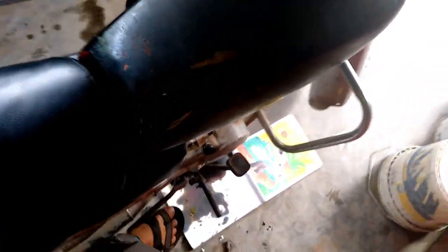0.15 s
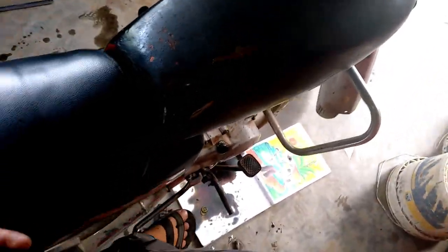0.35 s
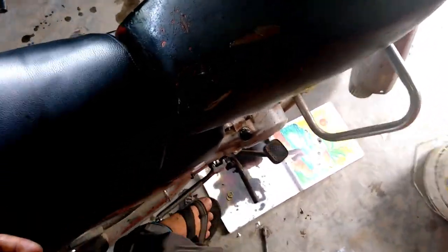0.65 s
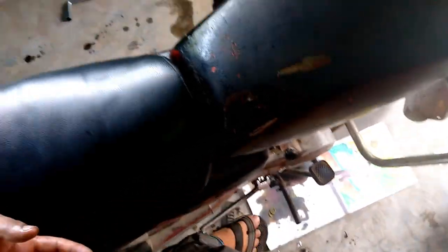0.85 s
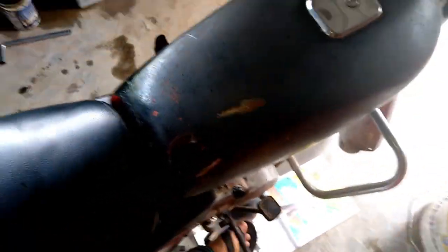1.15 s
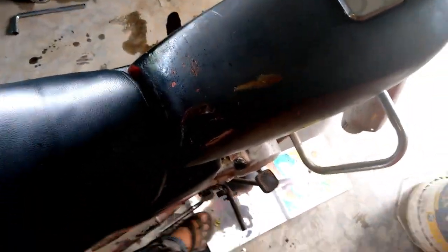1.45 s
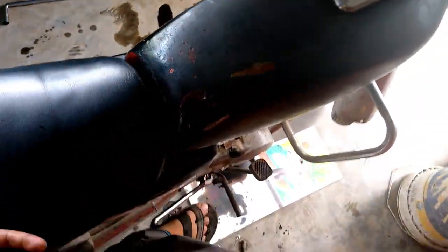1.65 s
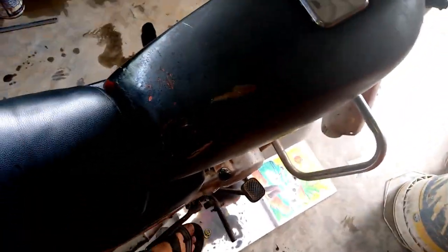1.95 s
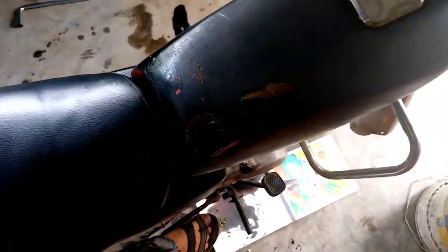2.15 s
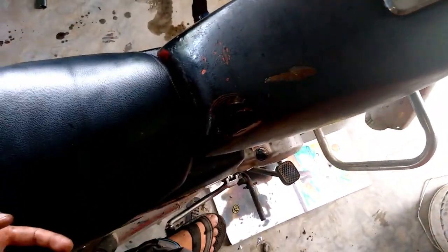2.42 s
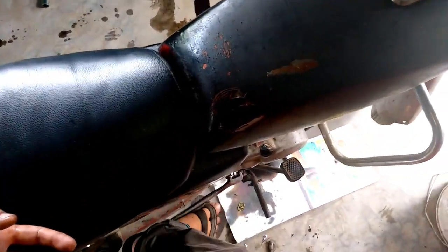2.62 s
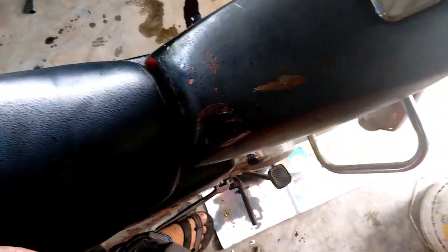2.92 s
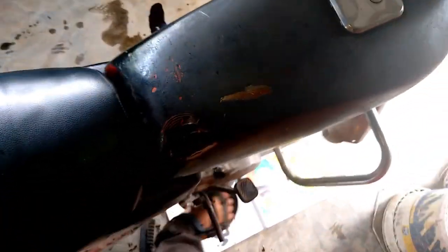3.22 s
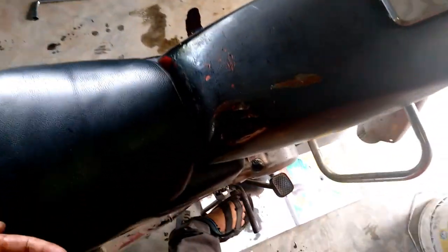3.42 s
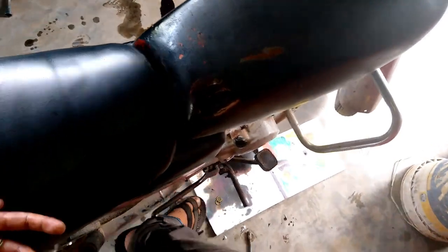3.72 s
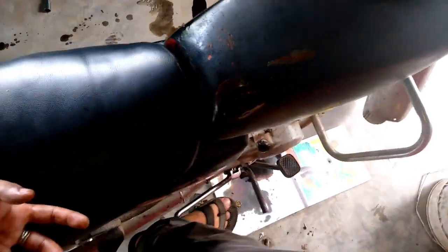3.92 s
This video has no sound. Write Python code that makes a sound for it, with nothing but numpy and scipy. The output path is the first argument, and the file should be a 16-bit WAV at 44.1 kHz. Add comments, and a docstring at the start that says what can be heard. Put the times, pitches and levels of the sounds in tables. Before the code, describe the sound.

Two kicks on a motorcycle's starter lever bring metal clangs, rapid clatter and low exhaust puffs, but the engine never catches.

```python
"""In a small workshop a foot works the kick lever of a single-cylinder motorcycle twice; it does not fire.
Impacts excite resonances: ratchet, valves and sandal clack, and the steel lever clangs on its stop.
The exhaust pipe puffs, the frame rocks on its stand, gears whirr, and friction makes squeaks and scrapes.
A phone hears it all through two unlike microphone ports."""
import sys
import numpy as np
from scipy import signal
from scipy.fft import rfft, irfft, next_fast_len
from scipy.io import wavfile
from scipy.ndimage import uniform_filter1d

SR = 44100
rng = np.random.default_rng(int(sys.argv[2]) if len(sys.argv) > 2 else 0)


def persist_wave(psi):
    """Save psi, clipped to +-1, as 16-bit WAV."""
    counts = np.round(np.clip(psi, -1, 1) * 32767).astype(np.int16)
    wavfile.write(sys.argv[1], SR, np.atleast_2d(counts).T)


N = 179531


def clacks():
    """Impact excitation: dense casing modes merge into noise; tank, struck part and cavity ring out."""
    # Each row: start in seconds, level, heft and brightness in dB, tank and part pitch in Hz,
    # softness as a factor on rise time.
    blows = [(.0044, -40, -13, 3, 705, 780, 1.1), (.2042, -65.5, 19, 2, 297, 985, 1.1),
             (.2275, -55.5, 13, -3, 273, 1280, 3), (.3072, -22, -14, 4, 347, 761, 2.5),
             (.4691, -29.5, .1, -14, 356, 948, 1.1), (.6, -71, 20, 6, 293, 760, 1.1),
             (.7889, -33.5, 2.5, -22, 358, 1107, 1.1), (.83, -24.5, -12, -15, 575, 902, 1.1),
             (.8838, -19.5, -15, -15, 477, 3686, 1.1), (.9176, -31, 7, 2, 340, 1070, 1.1),
             (.9878, -7.5, -17, 12, 388, 2450, .6), (1.0244, -23, -18, .1, 666, 1970, 1.1),
             (1.0565, -20, -14, 5, 322, 2077, 1.1), (1.0943, -21, -20, -5, 205, 2500, 1.1),
             (1.1406, -22, -10, 1.1, 556, 3686, 1.1), (1.1938, -21.5, -14, .1, 377, 856, 2.5),
             (1.254, -22, -13, -3, 580, 936, 2.5), (1.3284, -19.5, -22, -2, 560, 1642, 3.5),
             (1.3852, -17.5, -21, .1, 556, 3470, 1.5), (1.4411, -21.5, -18, -3, 563, 1572, 2.5),
             (1.5093, -20.5, -18, 1.1, 710, 2273, 1.5), (1.555, -40.5, 9, -4, 205, 866, 1.1),
             (1.5888, -37.5, 9, 5, 268, 755, 1.1), (1.643, -28.5, -10, -8, 264, 1305, 1.1),
             (1.6793, -24, -4, -4, 363, 1147, 1.1), (1.8354, -44, -10, -10, 403, 840, 1.1),
             (2.2075, -36.5, 17, -18, 247, 899, 1.1), (2.2288, -30, .1, -14, 227, 911, 2.5),
             (2.2694, -36.5, 7, -3, 238, 953, 1.1), (2.3454, -20.5, -11, 2, 423, 2060, 4),
             (2.5134, -32.5, -1, -4, 366, 1747, 1.5), (2.5424, -22.5, -4, -1, 629, 928, 1.5),
             (2.86, -73, 25, 25, 266, 886, 1.1), (2.8854, -60.5, 19, 20, 277, 894, 1.1),
             (2.9244, -46, -4, 3, 376, 1207, 3), (2.9831, -26.5, -8, -10, 477, 911, 1.5),
             (3.0394, -34, 5, -3, 417, 1032, 1.1), (3.0694, -19.5, -9, -10, 602, 3640, 1.1),
             (3.1077, -31.5, 3, -5, 358, 908, 1.1), (3.1548, -8, -14, 14, 361, 2467, .6),
             (3.1967, -18.5, -13, 3, 307, 2570, 1.1), (3.222, -16.5, -16, -1, 272, 3340, 1.1),
             (3.253, -19.5, -18, 6, 287, 2490, 1.1), (3.2916, -25, -12, -7, 199, 3620, 1.1),
             (3.3361, -24.5, -13, -6, 359, 958, 1.5), (3.3852, -24.5, -9, -1, 276, 978, 2.5),
             (3.4476, -24.5, -8, 3, 405, 866, 1.5), (3.5123, -24, -11, 3, 394, 869, 2.5),
             (3.5945, -19, -17, -1, 560, 2750, 1.5), (3.672, -19.5, -17, 1.1, 400, 857, 3.5),
             (3.749, -20, -26, -1, 701, 2517, 1.5), (3.8242, -37, -1, -8, 644, 860, 1.1),
             (3.9287, -56, 3, -3, 391, 1115, 3)]
    # Each row: low and high edge in Hz, rise and nominal t60 in seconds, level in dB, then dB added
    # per dB of heft, per dB of brightness and per octave of the part above 1 kHz.
    bands = [(1724, 3650, .002, .2, -4.5, 0, 0, 0), (200, 680, .008, .24, -5.5, .95, 0, 0),
             (700, 1400, .003, .2, -5.5, .5, -.12, -4), (4270, 7600, .001, .21, -10, 0, .4, 0),
             (7570, 21000, .0012, .24, -15.5, 0, .95, 0)]
    t, out, power = np.arange(SR // 4) / SR, np.zeros((2, N)), np.zeros((len(bands), N))
    for start, db, heft_db, bright_db, tank_hz, part_hz, softness in blows:
        longer = 1 + .012 * (heft_db + 15)  # a heavier blow rings longer
        octaves = np.log2(part_hz / 1e3)
        for band_power, (_, _, rise, t60, band_db, per_heft, per_bright, per_octave) in zip(power, bands):
            level_db = db + band_db + per_heft * heft_db + per_bright * bright_db + per_octave * octaves
            add(band_power, start, (gain_of(level_db) * struck(t, t60 * longer, rise * softness)) ** 2)
        boom = gain_of(heft_db - 4.5) * struck(t, t60=.18 * longer, rise=.005)
        boom = boom * wavering(t, tank_hz, width_hz=90, alike=.9, steady=.8)
        part_db = -8.5 + 1.6 * octaves  # small parts ring out more
        part = gain_of(part_db) * struck(t, t60=.13, rise=.0015 * softness)
        part = part * wavering(t, part_hz, width_hz=350, alike=.2, steady=.4)
        knock_db = -11.5 - .5 * max(db + 15, 0)  # the hollow knock grows less under hard blows
        knock = gain_of(knock_db) * struck(t, t60=.12, rise=.006)
        knock = knock * wavering(t, hz=890, width_hz=160, alike=.4, steady=.5)
        add(out, start, gain_of(db) * (boom + part + knock))
    chatter = casing_resonance(flutter(per_s=270, depth_db=1), lift_db=5)
    for band_power, (low_hz, high_hz, *_) in zip(power, bands):
        bandpass = signal.butter(3, [low_hz, high_hz], "bandpass", fs=SR, output="sos")
        out += evened(signal.sosfilt(bandpass, chatter)) * np.sqrt(band_power + 1e-20)
    return out


def casing_resonance(x, lift_db):
    """Resonance: the casing amplifies sound near its natural frequencies."""
    # Each row: frequency and width in Hz, relative level in dB.
    modes = [(851, 44, 0), (1240, 74, -4), (1650, 67, 0), (2060, 15, -6), (2510, 78, -5), (2720, 24, -7),
             (2990, 23, -7), (3390, 120, -7), (4030, 52, -7), (4410, 21, -8), (4570, 81, -9)]
    return filtered(x, lambda f: 1 + sum(gain_of(db + lift_db) / (1 + (2 * (f - hz) / width) ** 2)
                                         for hz, width, db in modes))


def lever_stop():
    """Modal ringing: the lever hits its stop and bounces; its rattling roughens the decaying modes."""
    # Each row: start in seconds, relative level in dB.
    hits = [(0.9874, -6), (1.0232, -20.5), (1.0574, -24), (3.1551, -5.5), (3.2243, -20.5), (3.253, -25.5)]
    # Lever and footrest. Each row: frequency in Hz, relative level in dB, t60 in seconds.
    steel_modes = [(1996, -11, 0.25), (2160, -13, 0.24), (2213, -11, 0.29), (2360, -3, .22),
                   (2466, -5, .22), (2440, -4, .2), (3305, -16, .1), (3800, -4.5, .1), (4820, -13.5, 0.22),
                   (5040, -13.5, .2), (5264, -9, 0.16), (5450, -18, .15), (5920, -14.5, 0.17),
                   (5900, -23, .2), (6110, -19.5, .2), (7380, -16.5, 0.16), (8830, -4.5, 0.11),
                   (9520, -12, 0.18)]
    t, out = np.arange(SR // 3) / SR, np.zeros((2, N))
    attack = 1 - np.exp(-t / .0004)
    for start, db in hits:
        ring = sum(gain_of(mode_db - 60 * t / t60) * wavering(t, hz, width_hz=70, alike=.15, steady=.7)
                   for hz, mode_db, t60 in steel_modes)
        add(out, start, gain_of(db - 8) * ring * attack)
    return out


def exhaust_and_frame():
    """Damped oscillation: a slug of air or a jolt of the frame swells, swings and dies into a rumble."""
    # Each row: start in seconds, level in dB.
    puffs = [(.905, -14), (1.039, -17), (1.255, -20.5), (3.089, -17.5), (3.212, -17), (3.395, -18)]
    # Each row: start in seconds, level in dB, frequency in Hz, roundness (high gives a single lump).
    jolts = [(.014, -43.5, 96, 1.2), (.059, -43, 81, 1.2), (.119, -28, 88, 3), (.849, -43, 91, 1.2),
             (.946, -26.5, 75, 1.2), (.993, -21, 117, 1.2), (1.084, -34, 93, 1.2), (1.199, -34, 113, 1.2),
             (1.298, -36, 71, 1.2), (1.42, -33.5, 114, 1.2), (1.556, -32, 117, 1.2), (1.599, -33, 113, 1.2),
             (1.639, -29, 102, 1.2), (1.7, -40, 105, 2.5), (1.74, -42, 115, 2.5), (1.78, -38, 92, 1.5),
             (1.847, -28, 97, 4), (1.879, -29.5, 109, 3), (1.92, -27, 89, 2.5), (1.949, -33, 135, 1.2),
             (1.989, -33.5, 156, 2.5), (1.99, -33, 52, 1.5), (2.219, -31, 153, 1.2), (2.253, -22, 145, 2.5),
             (2.304, -26, 125, 1.2), (2.409, -39, 83, 2.5), (2.543, -37.5, 133, 1.2), (2.98, -41, 115, 1.2),
             (3.039, -33, 118, 1.2), (3.119, -22, 81, 1.2), (3.158, -24, 120, 1.2),
             (3.279, -28.5, 118, 1.2), (3.32, -29, 112, 1.2), (3.45, -29, 93, 1.2), (3.509, -37, 68, 1.2),
             (3.549, -38, 118, 1.2), (3.671, -47, 121, 1.2), (3.774, -48, 80, 1.2)]
    # Each row: frequency in Hz, relative level in dB.
    rumble_spectrum = [(25, -26), (50, -4), (75, 2), (130, 4), (180, -7), (260, -30), (450, -65)]
    pipe_hz, puff_roundness, swell_s = 70, 1.2, .015
    rumble_db, rumble_t60, rest_db = -11, .45, -59
    t, thumps, power = np.arange(SR // 3) / SR, np.zeros(N), np.full(N, gain_of(rest_db) ** 2)
    age = t / swell_s
    for start, db, hz, roundness in [(*puff, pipe_hz, puff_roundness) for puff in puffs] + jolts:
        swing = np.sin(2 * np.pi * hz * t) + .21 * np.sin(2 * np.pi * 1.9 * hz * t)
        swell = np.exp(roundness * (np.log(age + 1e-6) + 1 - age))
        add(thumps, start, gain_of(db) * swell * swing)
        tail = gain_of(db + rumble_db - 60 * t / rumble_t60) * (1 - np.exp(-age))
        add(power, start, tail ** 2)
    rumble = np.sqrt(power) * shaped_noise(rumble_spectrum, per_s=30, depth_db=2)
    return np.array([thumps, np.roll(thumps, -round(.0008 * SR))]) + rumble  # right leads by 0.8 ms


def gears():
    """Forced vibration: turning gears whirr and the casing drones between the blows."""
    # Each row: time in seconds, whirr and drone level in dB.
    levels = [(0.0, -80, -95), (.26, -67, -53), (.48, -63, -64), (.58, -90, -95), (.8, -51, -52),
              (.93, -35, -34), (1.03, -33, -33), (1.13, -39, -42), (1.28, -44, -46), (1.42, -51, -57),
              (1.56, -45, -38), (1.79, -48, -48), (1.83, -60, -58), (1.9, -55, -53), (2.0, -72, -72),
              (2.19, -74, -76), (2.24, -52, -55), (2.38, -41, -60), (2.46, -50, -72), (2.63, -54, -72),
              (2.72, -68, -83), (2.92, -72, -68), (3.0, -41, -43), (3.06, -40, -38), (3.16, -33, -34),
              (3.31, -33, -38), (3.42, -44, -43), (3.55, -46, -51), (3.63, -41, -46), (3.72, -43, -59),
              (3.84, -48, -51), (3.95, -62, -53), (4.07, -74, -76)]
    # Each row of both: frequency in Hz, relative level in dB.
    whirr_spectrum = [(500, -30), (1000, -7), (2000, 12), (4000, 0.5), (8000, -7), (12000, -1.5),
                      (16000, -10.5)]
    drone_spectrum = [(120, -25.5), (200, -10.5), (350, 7), (600, -8), (1100, 2.5), (1800, -22)]
    times, whirr_db, drone_db = np.transpose(levels)
    t = np.arange(N) / SR
    whirr = gain_of(np.interp(t, times, whirr_db)) * shaped_noise(whirr_spectrum, per_s=200, depth_db=2.5)
    drone = gain_of(np.interp(t, times, drone_db)) * shaped_noise(drone_spectrum, per_s=60, depth_db=2)
    return whirr + drone


def spring_squeaks():
    """Friction-induced vibration: the return spring gives thin, unsteady tones."""
    # Each row: start and length in seconds, frequency in Hz, level in dB.
    squeaks = [(1.69, .06, 12000, -55), (2.223, .12, 9820, -54), (2.36, .09, 11900, -56),
               (2.865, .073, 9200, -61)]
    t, out = np.arange(SR // 3) / SR, np.zeros((2, N))
    for start, length, hz, db in squeaks:
        tone = wavering(t, hz, width_hz=180, alike=.1, steady=.2)
        add(out, start, gain_of(db) * stroke(t, length) * tone)
    return out


def sandal_scrapes():
    """Sliding friction: sandal and lever rub out a broadband hiss."""
    # Each row: start and length in seconds, level in dB.
    rubs = [(.032, .06, -64), (.2, .09, -70), (2.22, .24, -47), (2.56, .15, -48), (2.868, .1, -60),
            (3.84, .09, -61)]
    # Each row: frequency in Hz, relative level in dB.
    spectrum = [(1000, -12), (2000, -12), (4000, -15), (6000, -9), (9000, -8), (12000, 4), (15500, 10)]
    t, envelope = np.arange(SR // 3) / SR, np.zeros(N)
    for start, length, db in rubs:
        add(envelope, start, gain_of(db) * stroke(t, length))
    return envelope * shaped_noise(spectrum, per_s=400, depth_db=2.5)


def workshop_air():
    """Ambient noise: a faint rumble and hiss fill the room."""
    # Each row: frequency in Hz, relative level in dB.
    spectrum = [(30, -14), (100, 2.5), (400, -13), (1500, -24), (6000, -26.5), (16000, -13.5)]
    return gain_of(-59) * shaped_noise(spectrum, per_s=24, depth_db=3)


def struck(t, t60, rise):
    """Envelope of a blow: a quick rise, then an ever faster fall, so the tail stops as if gated."""
    return gain_of(-60 * t / t60 - 6 * t * t / .02) * (1 - np.exp(-t / rise))


def stroke(t, length):
    """Envelope of a rub: quick in, slow out."""
    return np.sin(np.pi * np.sqrt(np.clip(t / length, 1e-9, 1))) * (t < length)


def wavering(t, hz, width_hz, alike, steady):
    """Random modulation spreads a tone round a steady core; alike correlates the two channels."""
    a, b = evened(uniform_filter1d(rng.standard_normal((2, 2, len(t))), int(SR / width_hz)))
    phase = 2 * np.pi * hz * t
    core = steady * np.cos(phase + np.pi * rng.standard_normal((2, 1)))
    left, other = a * np.cos(phase) + b * np.sin(phase) + core
    return evened(np.array([left, alike * left + np.sqrt(1 - alike ** 2) * other]))


def flutter(per_s, depth_db):
    """Amplitude modulation: stereo noise jumps in level, alike in the bass and unrelated in the treble."""
    # Each row: frequency in Hz, left-right correlation from 0 to 1.
    coherence = [(60, 0.79), (250, .85), (500, .6), (900, .3), (1500, .0), (15000, 0.036)]
    jumps = evened(uniform_filter1d(rng.standard_normal(N), int(SR / per_s)))
    left, other = rng.standard_normal((2, N))
    common = filtered(left, lambda f: value_at(coherence, f))
    separate = filtered(other, lambda f: np.sqrt(1 - value_at(coherence, f) ** 2))
    return evened(np.array([left, common + separate]) * gain_of(depth_db * jumps))


def shaped_noise(spectrum, per_s, depth_db):
    """Spectral shaping of fluttering noise, at rms 1."""
    return evened(coloured(flutter(per_s, depth_db), spectrum))


def coloured(x, spectrum):
    """Filters by rows of frequency in Hz and gain in dB."""
    return filtered(x, lambda f: gain_of(value_at(spectrum, f)))


def filtered(x, gain):
    """Weights the spectrum by gain(Hz)."""
    size = next_fast_len(N)
    return irfft(rfft(x, size) * gain(np.fft.rfftfreq(size, 1 / SR)), size)[..., :N]


def value_at(points, hz):
    """Interpolates on a log-frequency axis."""
    f, value = np.transpose(points)
    return np.interp(np.log(hz + 1), np.log(f + 1), value)


def gain_of(db):
    """Decibels to amplitude."""
    return 10 ** (np.asarray(db) / 20)


def evened(x):
    """Scales to rms 1."""
    return x / np.sqrt(np.mean(x ** 2) + 1e-20)


def add(mix, start, sound):
    """Mixes a sound in at start seconds."""
    part = mix[..., round(start * SR):][..., :sound.shape[-1]]
    part += sound[..., :part.shape[-1]]


def scene():
    """Superposition: all sources add to the air of the workshop."""
    air = workshop_air()
    return clacks() + lever_stop() + exhaust_and_frame() + gears() + spring_squeaks() + sandal_scrapes() + air


def record(dry):
    """Port resonance colours each channel; peaks past full scale clip; a low-pass limits the band."""
    # Each row of both: frequency in Hz, gain in dB.
    left_port = [(60, -3), (500, 1.5), (1500, -3), (3000, -6), (5000, 0.5), (5950, 10), (6500, 5),
                 (7400, -8), (8200, -13), (11000, -16), (12000, -12.5), (14000, -26.5), (16000, -27.5)]
    right_port = [(60, -2), (500, 4), (1500, -2.5), (3000, -7), (5000, -1.5), (6400, -3.5), (7800, -9.5),
                  (9000, 3.5), (10000, 1), (11000, -3.5), (11700, -7), (13400, -11.5), (14200, -23.5),
                  (16000, -37.5)]
    edge_hz = 15700
    heard = np.clip([coloured(dry[0], left_port), coloured(dry[1], right_port)], -1, 1)
    lowpass = signal.firwin(511, edge_hz, window=("kaiser", 9), fs=SR)
    return signal.oaconvolve(heard, lowpass[None], "same")


dry = scene()
out = record(dry)
persist_wave(out)
```